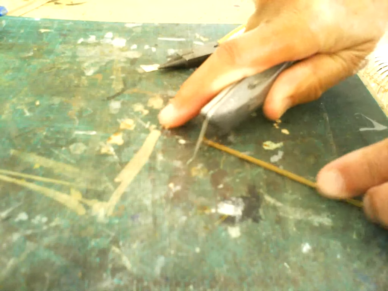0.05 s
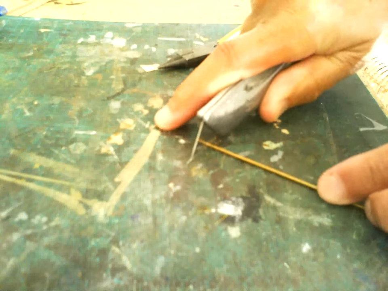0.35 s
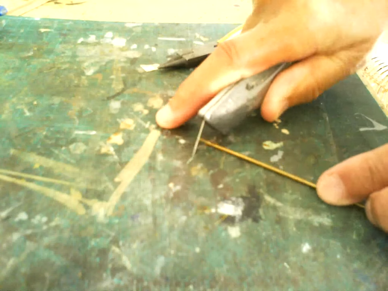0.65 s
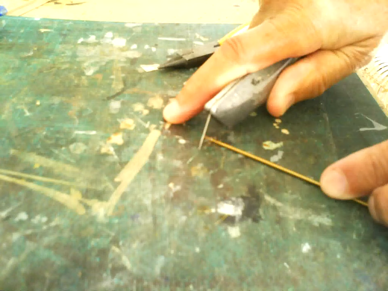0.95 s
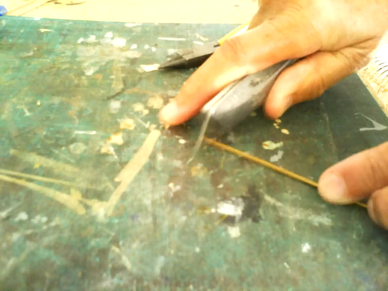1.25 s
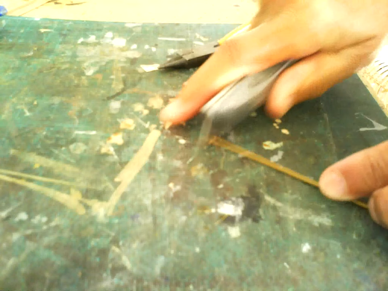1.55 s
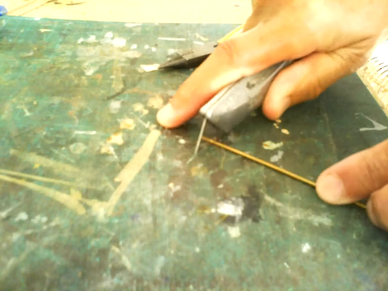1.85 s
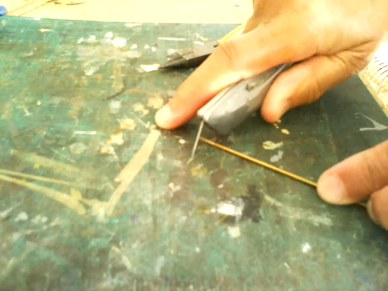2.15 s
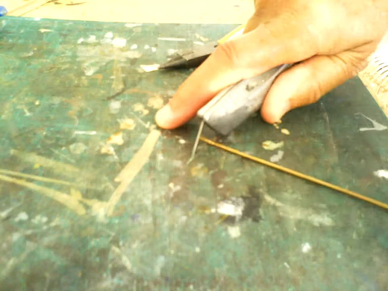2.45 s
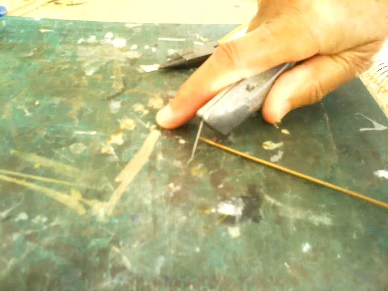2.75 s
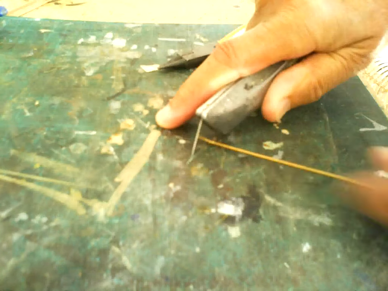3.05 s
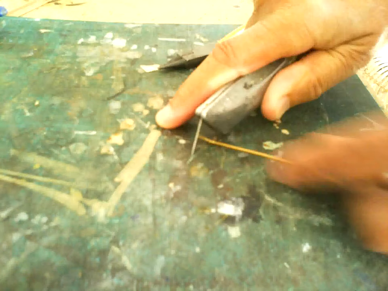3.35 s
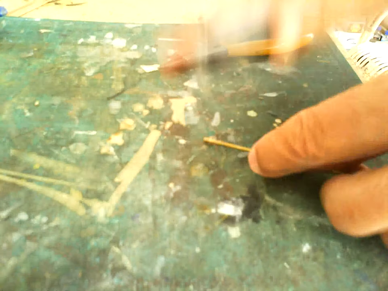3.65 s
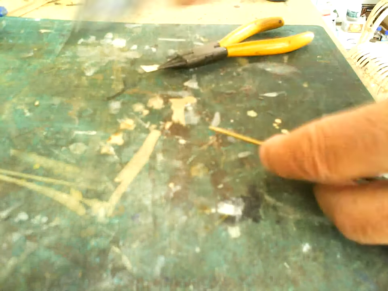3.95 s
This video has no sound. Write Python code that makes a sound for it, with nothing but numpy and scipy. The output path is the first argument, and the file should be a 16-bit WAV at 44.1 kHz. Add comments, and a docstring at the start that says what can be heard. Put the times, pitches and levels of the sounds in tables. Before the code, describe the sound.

Close up in a small, quiet room, a thin metal tube rumbles and ticks as it is rolled under a knife blade. A few sharp clicks follow, then a cluster of louder knocks as the knife is put aside.

```python
"""A thin brass tube rolls to and fro under a craft knife on a cutting board: the strokes rumble
in the board and rock the table, and the tube ticks as it slips under the edge.
The blade clicks, scrapes and sings thinly as it scores through; then hands and knife knock
on the table, and the knife is slid aside and put down.
Behind it lies a small quiet room with a low hum and a thin steady whine."""
import sys
import numpy as np
from scipy import signal
from scipy.fft import rfft, irfft
from scipy.io import wavfile

SR = 44100
rng = np.random.default_rng(int(sys.argv[2]) if len(sys.argv) > 2 else 0)


def wrap_up_sound(samples):
    """Save the sound to the file named by the first command line argument, as 16-bit audio."""
    columns = np.atleast_2d(samples).T
    # keep every value between -1 and 1, then stretch to whole-number steps
    tamed = np.clip(columns, -1, 1)
    steps = np.round(tamed * 32767).astype(np.int16)
    wavfile.write(sys.argv[1], SR, steps)


N = 176400
T = np.arange(N) / SR
HIT_N = N // 10  # samples in one hit or room tail
HIT_T = T[:HIT_N]

# modes of the cutting board: f/Hz, level/dB, t60/s
BOARD_MODES = [(320, -16.5, 0.016), (468.5, -1.5, 0.059), (557, 4.5, 0.01), (675, 0, 0.042),
               (902.6, -4.5, 0.031), (1280, -16, 0.05)]
# tone colour of hard contact and grit: f/Hz, level/dB
CRACK_COLOUR = [(1300, 4), (2200, 5.5), (3000, -1), (3900, -3), (5200, -11.5), (10000, -13.5), (16000, -26)]


def undb(db):
    """Decibels to gain."""
    return 10 ** (np.asarray(db) / 20)


def unit(x):
    """Scale to rms 1."""
    return x / np.std(x)


def fade(t, t60):
    """Exponential decay, 60 dB down after t60 seconds."""
    return np.exp(-np.log(1000) * t / t60)


def colour(x, points):
    """Minimum-phase EQ through points of f/Hz, level/dB."""
    hz, db = np.array(points).T
    size = 2 * len(x)
    curve_db = np.interp(np.log(np.fft.rfftfreq(size, 1 / SR) + 1), np.log(hz), db)
    cepstrum = irfft(np.log(undb(curve_db)))[:len(x)]
    cepstrum[1:] *= 2
    return irfft(rfft(x, size) * np.exp(rfft(cepstrum, size)))[:len(x)]


def narrow(hz, width_hz):
    """Noise in one narrow band, rms 1."""
    f = np.fft.rfftfreq(N, 1 / SR)
    return unit(irfft(rfft(rng.standard_normal(N)) / (1 + ((f - hz) / width_hz * 2) ** 2), N))


def ring(modes, detune=0):
    """Decaying sines of alternating sign, each with its own random relative detune."""
    out = np.zeros(HIT_N)
    for k, (hz, db, t60) in enumerate(modes):
        pitch = hz * (1 + detune * rng.standard_normal())
        out += (-1) ** k * undb(db) * fade(HIT_T, t60) * np.sin(2 * np.pi * pitch * HIT_T)
    return out


def swell(at, rise, fall):
    """Envelope of a push that builds to a peak and dies away; times in seconds."""
    return np.exp(-np.abs((T - at) / np.where(T < at, rise, fall)) ** 1.53)


def add(out, at, sound):
    """Mix a sound in at a time in seconds."""
    i = max(int(at * SR), 0)
    out[i:i + len(sound)] += sound[:N - i]


def bumps(per_s, spread_db):
    """Random small impacts of uneven size."""
    impacts = (rng.random(N) < per_s / SR) * rng.choice([-1, 1], N)
    return impacts * undb(spread_db * np.clip(rng.standard_normal(N), -2, 2))


def room(x, wet_db=0):
    """Add a short diffuse tail from the nearby walls; the treble dies first."""
    late = np.maximum(HIT_T - 0.00614, 0)  # pre-delay
    tail = 0
    for kind, t60, db in [("low", 0.64, -11.5), ("high", 0.17, -9)]:
        echoes = rng.standard_normal(HIT_N) * fade(late, t60) * (late > 0)
        band = signal.butter(2, 2000, kind, fs=SR, output="sos")
        tail = tail + undb(db) * signal.sosfilt(band, echoes / np.linalg.norm(echoes))
    return x + undb(wet_db) * signal.fftconvolve(x, tail)[:N]


def room_tone():
    """A bed of air, narrow bands of hum and hiss, and a thin electrical whine."""
    # tone colour of the air: f/Hz, level/dB
    air_colour = [(30, -18), (50, -2), (90, -17.5), (200, -8.5), (400, -22), (750, -19), (1400, -33),
                  (3000, -36.5), (12500, -36), (16000, -45)]
    # hum and hiss bands: f/Hz, width/Hz, level/dB
    hum_bands = [(52, 5.5, -57.5), (465.7, 18, -67), (8880, 550, -70.5)]
    air = undb(-55.5) * unit(colour(rng.standard_normal(N), air_colour))
    hum = sum(undb(db) * narrow(hz, width) for hz, width, db in hum_bands)
    whine = undb(-66.5) * np.sqrt(2) * np.sin(2 * np.pi * 8005 * T)
    return air + hum + whine


def crunch():
    """Grit crunches under the knife while it is pressed and shifted between the knocks."""
    grit = unit(colour(bumps(per_s=700, spread_db=5.1), CRACK_COLOUR))
    return undb(-60) * swell(at=3.18, rise=0.098, fall=0.098) * grit


def sliding():
    """Skin and knife handle rub across the board."""
    # sliding moves: peak t/s, rise/s, fall/s, level/dB
    slides = [(2.183, 0.011, 0.013, -49), (3.121, 0.034, 0.21, -41), (3.561, 0.012, 0.021, -38),
              (3.821, 0.052, 0.035, -39)]
    # tone colour of the rub: f/Hz, level/dB
    rub_colour = [(60, 5.5), (480, 8.5), (850, 3.5), (1300, -11), (2500, -18), (14000, -39)]
    rub = unit(colour(bumps(per_s=1500, spread_db=2.1), rub_colour))
    return rub * sum(undb(db) * swell(at, rise, fall) for at, rise, fall, db in slides)


def knocks():
    """Hands and knife land with a short push that rings board and table; hard contact adds a crack."""
    # blows: t/s, body peak/dB, contact/ms, table boom before trim/dB, crack before trim/dB
    blows = [(.365, -24.5, 0.1, -2.5, -42.5), (0.389, -26.5, 0.69, -9, -54), (.925, -27, 0.08, -22, -52),
             (1.091, -28, 0.07, -36, -40), (2.583, -34, 1, -12, -61), (3.056, -15.5, 0.46, 3, -38.5),
             (3.065, -22.5, 0.14, 5, -32.5), (3.127, -25.5, 1, 1, -53), (3.168, -17.5, 0.86, -3, -24.5),
             (3.172, -16, 0.18, 10, -29), (3.2428, -18, 0.75, -0.5, -29), (3.304, -25, 0.72, 5, -44),
             (3.373, -27, 1, 0, -43), (3.42, -20.5, 0.25, 11, -35), (3.425, -26.5, 0.38, -21, -39.5),
             (3.483, -25.5, 0.69, 1, -41), (3.514, -27.5, 0.12, 6, -40.5),
             (3.929, -23.5, 0.079, -17.5, -46.5)]
    # low modes of the table: f/Hz, level/dB, t60/s
    table_modes = [(132.4, -3, 0.12), (166.7, -3.5, 0.083), (279.3, -2.5, 0.1)]
    trim_db, crack_rise_s = -6, 0.00093
    out = np.zeros(N)
    for at, db, contact_ms, boom_db, crack_db in blows:
        push = HIT_T * np.exp(-HIT_T * 1000 / (contact_ms / 2))  # longer contact, duller knock
        board = ring(BOARD_MODES, detune=0.082)
        boom = undb(boom_db + trim_db) * ring(table_modes, detune=0.041)
        body = signal.fftconvolve(board + boom, push)[:HIT_N]
        crack = unit(colour(rng.standard_normal(HIT_N), CRACK_COLOUR))
        crack *= fade(HIT_T, t60=0.045) * np.minimum(HIT_T / crack_rise_s, 1)
        add(out, at, undb(db) * body / np.abs(body).max() + undb(crack_db + trim_db) * crack)
    return out


def squeal():
    """The edge sings thinly on the brass as the cut finishes: two bands an octave apart."""
    hz, width_hz = 2490, 300
    tones = narrow(hz, width_hz) + narrow(2 * hz, 2 * width_hz)
    return undb(-70) * swell(at=1.65, rise=0.12, fall=0.12) * tones


def scraping():
    """The edge drags over the brass with a fine, grainy hiss."""
    # drags of the edge: peak t/s, rise and fall/s, level/dB
    scrapes = [(0.682, .035, -63.5), (0.912, 0.024, -57.5), (1.143, 0.029, -70), (1.54, 0.058, -61)]
    # tone colour of steel on brass: f/Hz, level/dB
    hiss_colour = [(2000, -4), (5000, -3), (12000, -6.5), (16000, -17)]
    hiss = unit(colour(bumps(per_s=6000, spread_db=3.7), hiss_colour))
    return hiss * sum(undb(db) * swell(at, ramp, ramp) for at, ramp, db in scrapes)


def blade_clicks():
    """Blade and holder slip: dry chatter rings short steel modes, and the contact sets the colour."""
    # slips: t/s, peak/dB, focus f/Hz, roll-off to either side/(dB per octave)
    slips = [(.548, -31, 1910, 5), (1.316, -39.5, 1510, 7.5), (2.037, -26.5, 11000, 11),
             (2.6662, -29.5, 5200, 11.5), (3.056, -25.5, 3500, 12.5), (3.101, -27, 5800, 10),
             (3.107, -23.5, 7330, 21.5), (3.16, -34.5, 8900, 9), (3.167, -26, 5850, 12),
             (3.292, -22, 8950, 9), (3.931, -37, 6940, 9)]
    # modes of the blade: f/Hz, level/dB, t60/s
    blade_modes = [(1850, 4.5, 0.03), (3516, -2.5, 0.018), (5190, 5, 0.0097), (6080, 4.5, 0.009),
                   (9250, 2, 0.013), (9990, 7.5, 0.014), (12000, -19, 0.0026)]
    chatter_s, grit_db = 0.0024, -6
    ringing_slope = 16.6  # dB per octave; contacts this focused ring fully, broader ones crack dryly
    top_cut = signal.butter(4, 11500, fs=SR, output="sos")
    out = np.zeros(N)
    for at, db, hz, slope in slips:
        chatter = rng.standard_normal(HIT_N) * np.exp(-(HIT_T / chatter_s) ** 2)
        steel = signal.fftconvolve(chatter, ring(blade_modes, detune=0.025))[:HIT_N]
        focus = [(hz * 2. ** octave, -slope * abs(octave)) for octave in range(-4, 3)]
        ringing = min(slope / ringing_slope, 1) ** 2
        snap = colour(ringing * unit(steel) + undb(grit_db) * unit(chatter), focus)
        snap = signal.sosfilt(top_cut, snap)
        add(out, at, undb(db) * snap / np.abs(snap).max())
    return out


def tube_ticks():
    """The tube slips under the edge: a few milliseconds of chatter excite its modes."""
    # slips: t/s, peak/dB
    slips = [(0.081, -50), (0.402, -40.5), (0.803, -43.5), (.962, -50), (0.99, -54.5), (1.103, -41),
             (1.13, -53), (1.165, -52), (1.2, -31.5), (1.568, -49), (1.598, -48)]
    # modes of the brass tube: f/Hz, level/dB, t60/s
    tube_modes = [(1437, -6.5, 0.05), (2527, 6, 0.013), (2585, 7.5, 0.015)]
    rise_s = 0.0019
    out = np.zeros(N)
    for at, db in slips:
        chatter = rng.standard_normal(HIT_N) * HIT_T * np.exp(-HIT_T / rise_s)
        tick = signal.fftconvolve(chatter, ring(tube_modes, detune=0.0069))[:HIT_N]
        add(out, at, undb(db) * tick / np.abs(tick).max())
    return out


def tube_rolling():
    """The tube bumps over the rough board and each push rocks the table."""
    # strokes: peak t/s, rise/s, fall/s, rumble gain/dB, rocking level/dB
    strokes = [(0.028, 0.04, 0.017, -36.5, -33.5), (0.217, 0.035, 0.028, -34.5, -46.5),
               (0.365, 0.014, 0.055, -34.5, -40), (0.744, 0.012, 0.023, -40, -41.5),
               (0.934, 0.031, 0.045, -38, -37.5), (1.095, 0.0058, 0.069, -36, -36.5),
               (1.319, 0.017, 0.032, -46, -57), (1.522, 0.026, 0.049, -40.5, -40.5)]
    # tone colour of the roll: f/Hz, level/dB
    roll_colour = [(60, 0.5), (115, 9), (220, -1.5), (700, -18), (1000, -32), (1500, -27.5), (3000, -34),
                   (12000, -43)]
    grain = bumps(per_s=1700, spread_db=5.5)
    board_ring = unit(signal.fftconvolve(grain, ring(BOARD_MODES))[:N])
    rumble = unit(colour(grain, roll_colour)) + undb(-3.5) * board_ring
    out = np.zeros(N)
    for at, rise, fall, rumble_db, rock_db in strokes:
        rock_hz = 50 * (1 + 0.06 * rng.standard_normal())
        rock = np.sqrt(2) * np.sin(2 * np.pi * rock_hz * T)
        out += undb(rumble_db) * swell(at, rise, fall) * rumble
        out += undb(rock_db) * swell(at, rise=0.026, fall=0.074) * rock
    return out


def scene():
    """The work table close up, in mono over the room tone; the tube's ticks are the driest layer."""
    board = room(tube_rolling() + sliding() + knocks() + crunch())
    tube = room(tube_ticks(), wet_db=-12)
    blade = room(blade_clicks() + scraping() + squeal(), wet_db=-2)
    return (room_tone() + board + tube + blade)[None]


def record(dry):
    """Master EQ: thin the lowest bass and cut the top steeply."""
    low_cut = signal.butter(2, 22, "high", fs=SR, output="sos")
    top_cut = signal.ellip(8, 0.2, 70, 15800, fs=SR, output="sos")
    return signal.sosfilt(top_cut, signal.sosfilt(low_cut, dry))


dry = scene()
out = record(dry)
wrap_up_sound(out)
```